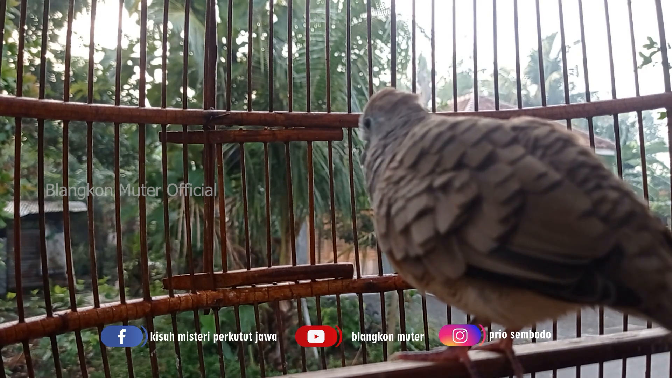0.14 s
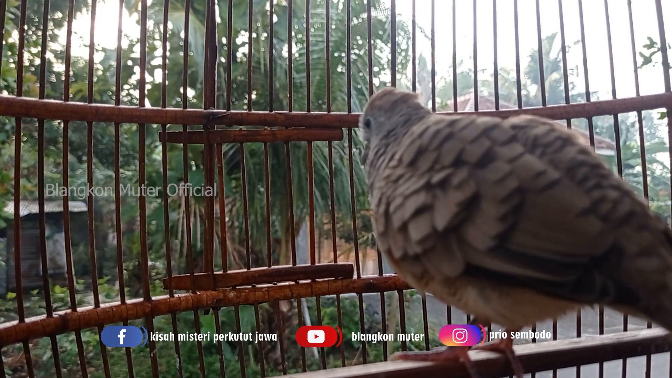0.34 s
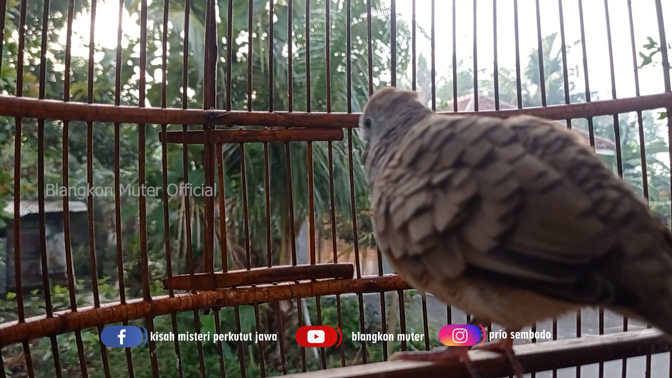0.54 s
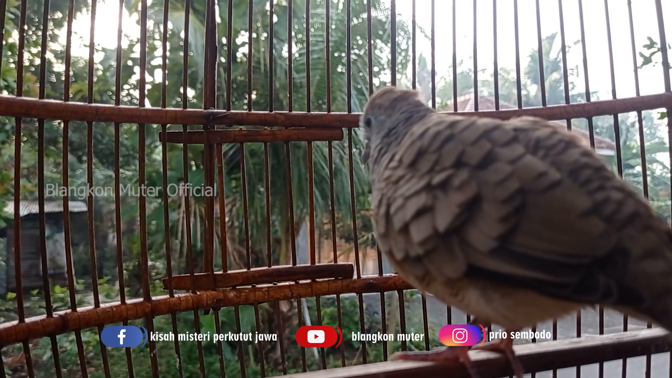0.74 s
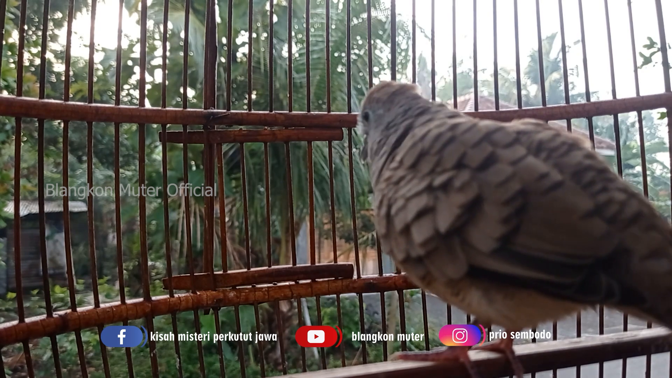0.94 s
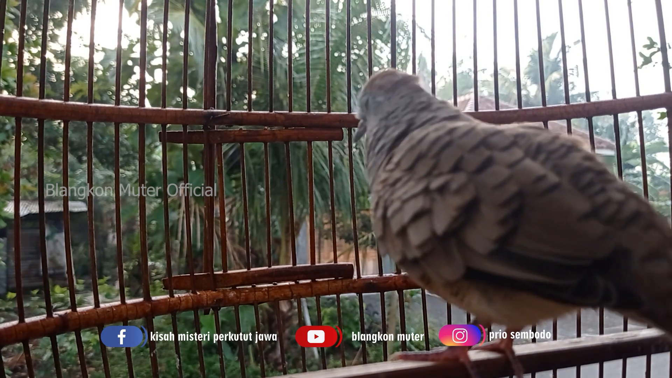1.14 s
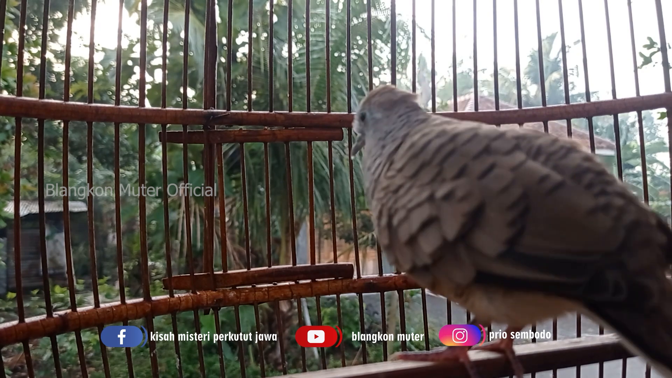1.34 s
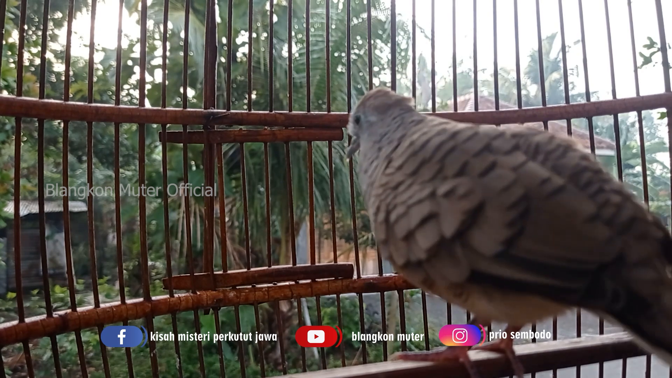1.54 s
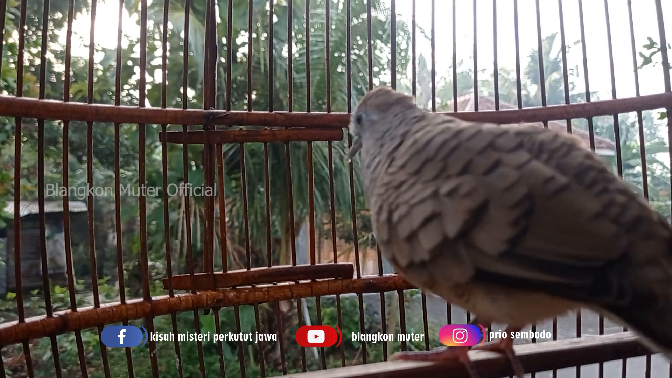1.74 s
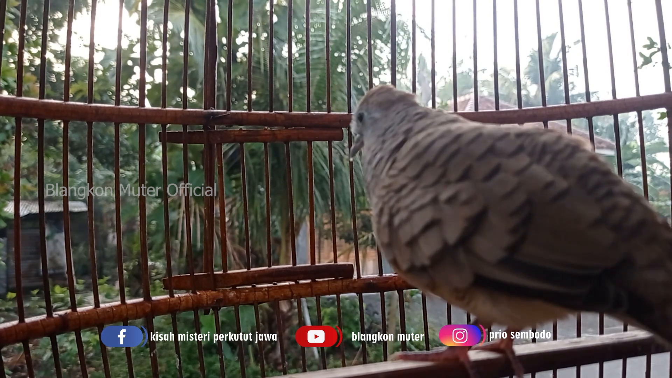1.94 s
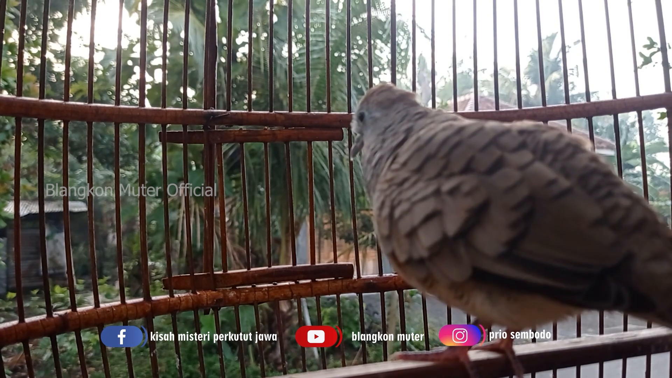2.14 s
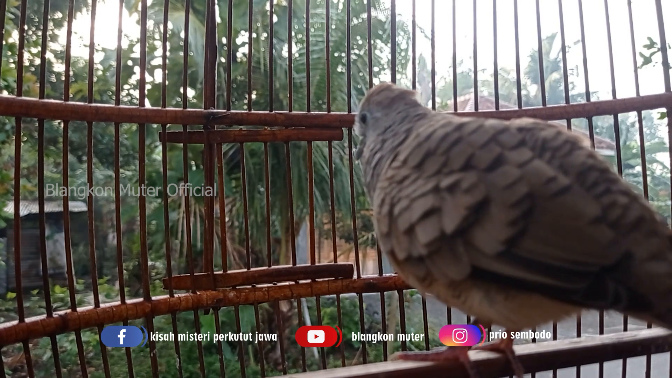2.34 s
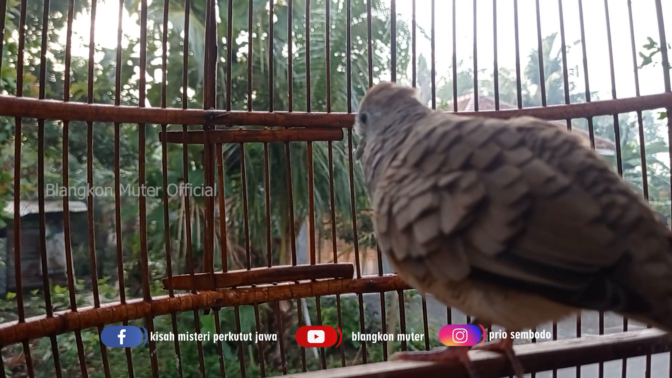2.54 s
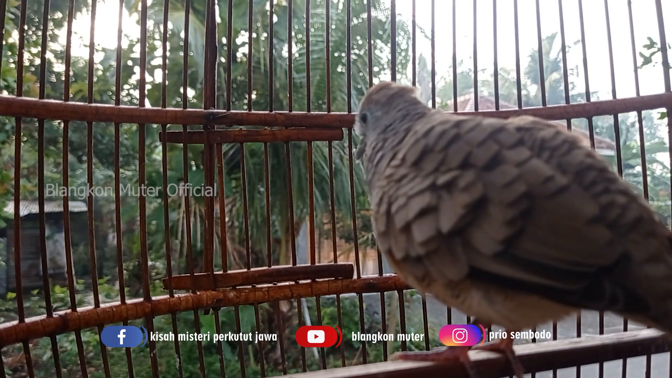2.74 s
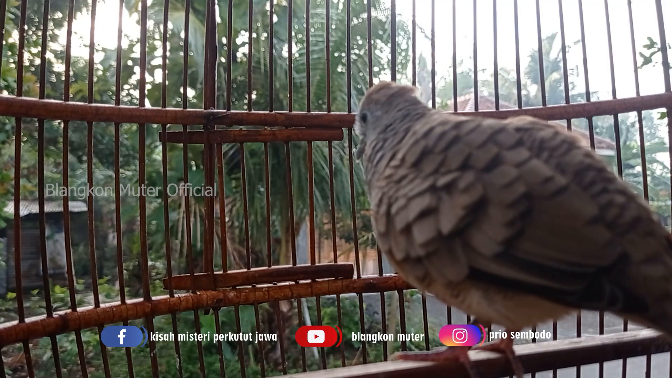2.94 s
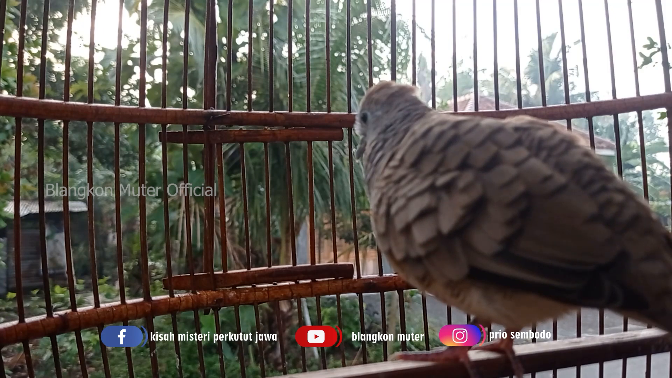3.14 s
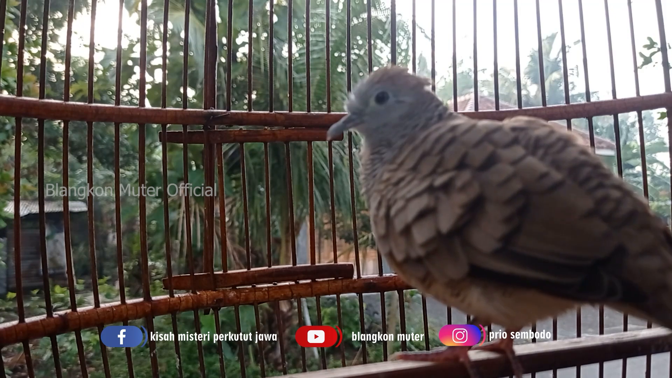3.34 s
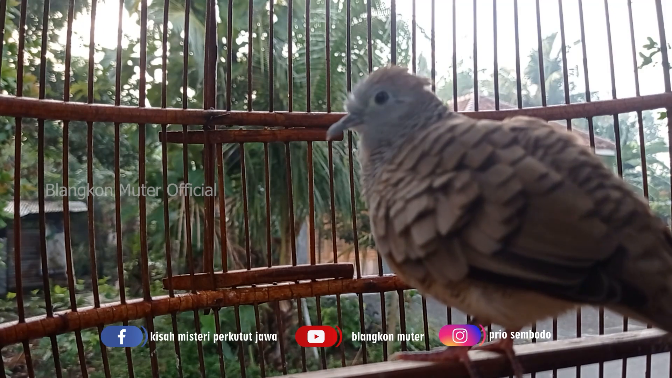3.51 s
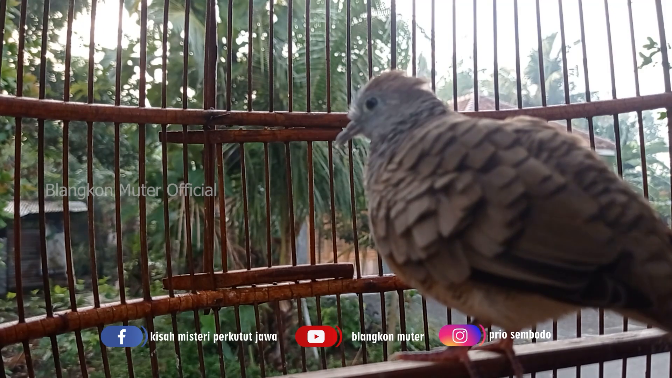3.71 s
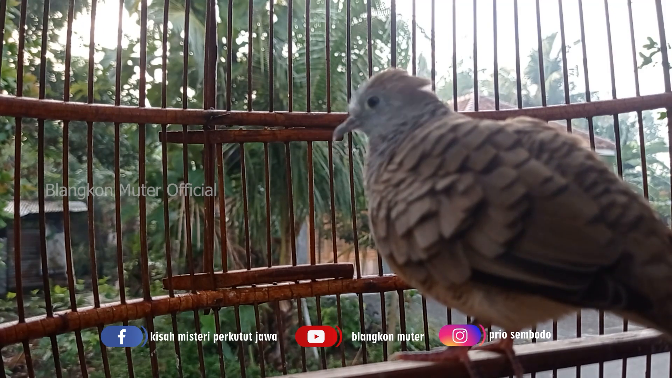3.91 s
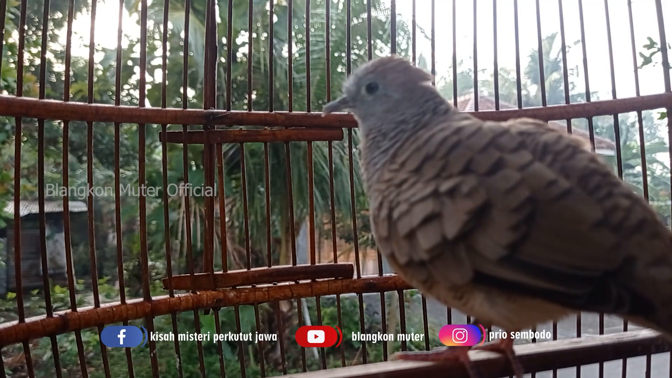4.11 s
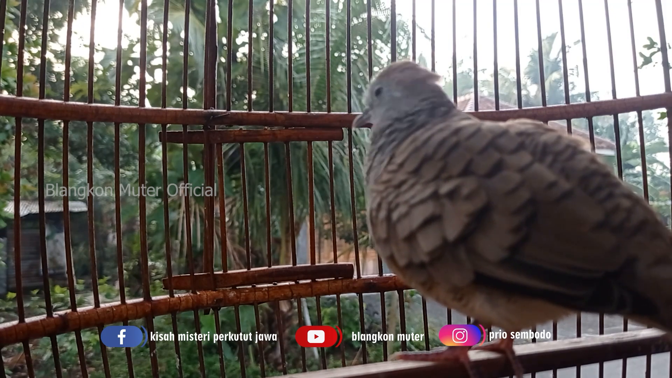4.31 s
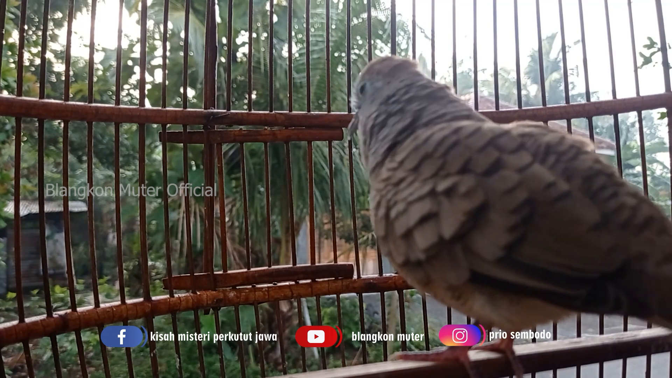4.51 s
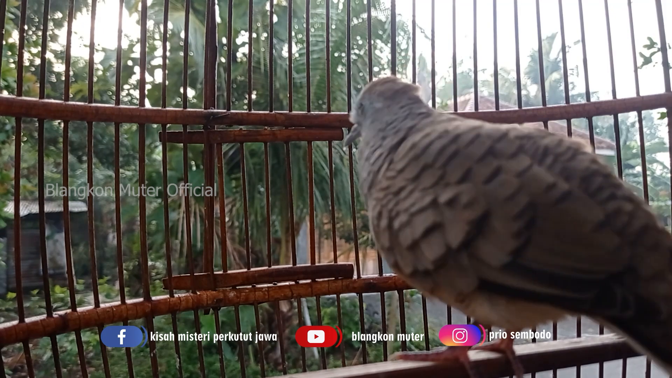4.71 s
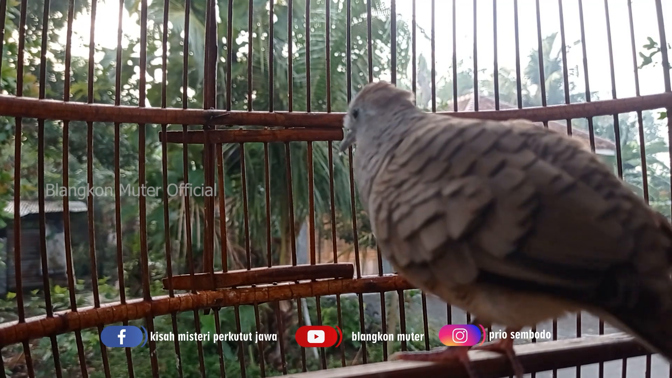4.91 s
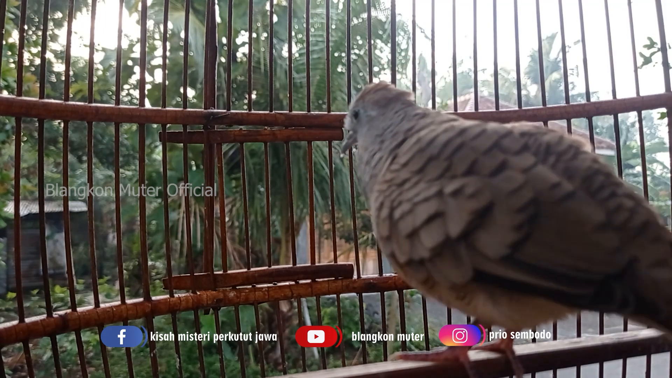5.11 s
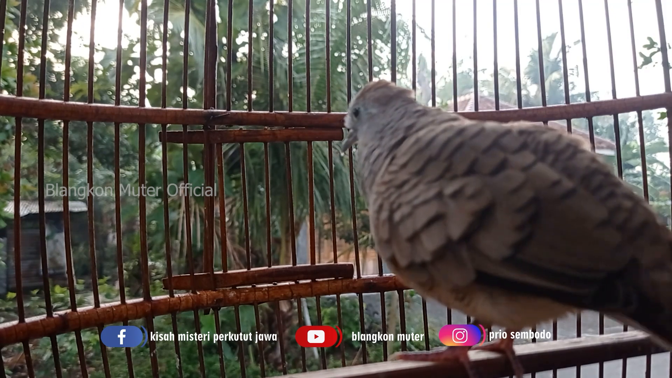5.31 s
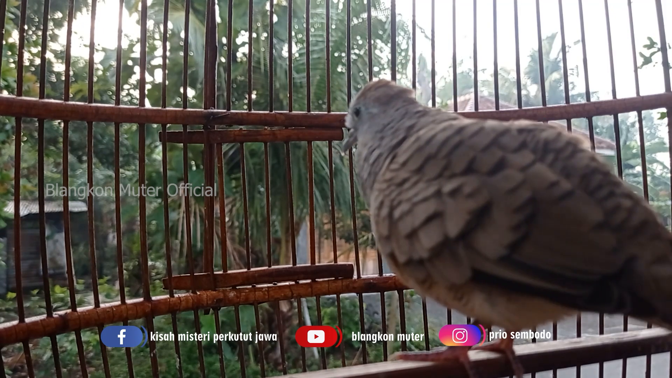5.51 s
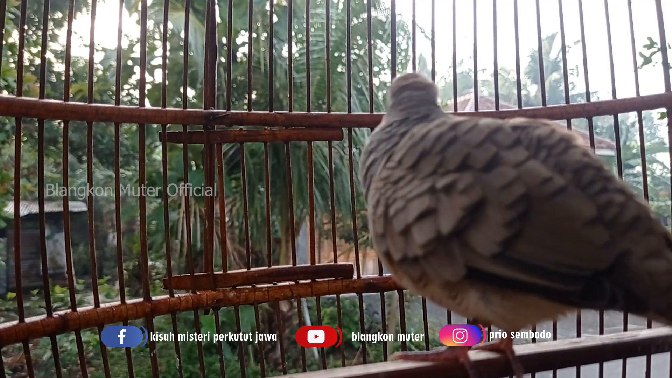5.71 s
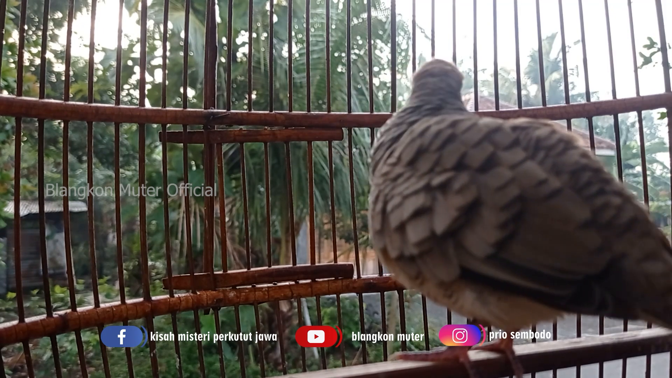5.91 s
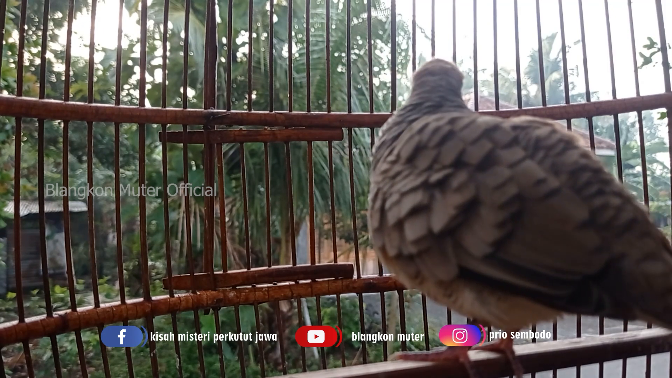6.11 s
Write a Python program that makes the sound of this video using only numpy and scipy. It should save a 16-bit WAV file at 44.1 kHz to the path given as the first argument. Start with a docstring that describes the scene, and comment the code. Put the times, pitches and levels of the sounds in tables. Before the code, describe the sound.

Open garden air with low traffic rumble, a faint coming-and-going motor hum and patchy bright hiss. From 0 to about 1 s a bigger dove, far off and diffuse, gives short purring coos and a longer falling one. At 1.1 s the near dove rasps, chucks low and breaks upward into a clear coo of about a tenth of a second, followed until 1.95 s by nine clipped, round notes, rapid at first, then more spaced. From 2 to 4 s small birds give thin falling chirps and harsh calls, with soft rustles near 2.5 and 2.9 s and a very faint high ringing around 3.6 to 4.2 s. The far dove purrs again from 3.7 to 4.7 s. At 4.5 s the near dove repeats its phrase, ending about 5.4 s. Distant whistles, chirps and hiss continue, thinning to quiet air and rumble by 6.3 s.

```python
"""A zebra dove caged outdoors, close to the microphone, sings two phrases: a long coo, then clipped ones.
Each note may start as a rasp of puffs ringing the throat, swells as a low gliding chuck and breaks upward
into a clear arched tone with overtones. Farther off a bigger dove purrs in chopped gliding tones, small
birds chirp in falling noisy tones, and coloured noise makes far chatter, rustles and a swelling hiss.
Under them lie a traffic rumble, a motor's hum and open air; for a moment a thin ringing sounds high up."""
import sys
import numpy as np
from scipy import signal
from scipy.fft import rfft, irfft
from scipy.io import wavfile

SR = 44100
rng = np.random.default_rng(int(sys.argv[2]) if len(sys.argv) > 2 else 0)


def wrap_up_sound(samples):
    """Save the sound to the file named by the first command line argument, as 16-bit audio."""
    columns = np.atleast_2d(samples).T
    # keep every value between -1 and 1, then stretch to whole-number steps
    tamed = np.clip(columns, -1, 1)
    steps = np.round(tamed * 32767).astype(np.int16)
    wavfile.write(sys.argv[1], SR, steps)


N = 276066
TIME = np.arange(N) / SR
CUTOFF_HZ = 15800

# All levels are relative; a half length runs from the middle to 3 dB down.
# open air, steady colour: f/Hz, density/dB per Hz
AIR_COLOUR = [(150, 7.5), (450, 3.5), (700, 6.5), (1000, -2.5), (2000, -4), (4000, -19.5), (6300, -13),
              (8000, -21.5), (10000, -18), (13000, -49)]
# strength of the open air: t/s, level/dB
AIR_LEVEL = [(0, -67.5), (1.4, -66), (2.6, -63.5), (3.3, -62.5), (4.0, -64), (5.3, -69), (6.26, -70)]
# far traffic rumble, colour: f/Hz, density/dB per Hz
RUMBLE_COLOUR = [(20, -38), (40, -34), (62, -2), (80, 2.5), (115, 0), (150, 4.5), (200, -3.5), (320, -6.5),
                 (450, -19), (700, -17.5), (1500, -49)]
# strength of the rumble: t/s, level/dB
RUMBLE_LEVEL = [(0, -55), (.9, -54), (1.9, -56), (2.7, -56), (3.25, -63), (3.55, -57), (4.55, -55.5),
                (4.9, -61), (5.2, -56.5), (5.9, -59), (6.26, -60)]
# slow swells of far traffic: middle t/s, half length/s, level/dB
TRAFFIC_SWELLS = [(3.05, 0.155, -67.5), (5.68, 0.19, -60)]
# colour of those swells: f/Hz, density/dB per Hz
TRAFFIC_SWELL_COLOUR = [(120, -20), (220, -3.5), (300, 5.5), (400, -10), (600, -20.5), (1000, -47)]
# a far motor's hum, coming and going: middle t/s, half length/s, level/dB, f/Hz
HUM = [(.08, 0.19, -50, 173.3), (.53, 0.13, -51, 173), (.92, .08, -53, 173.8), (1.55, 0.39, -58.5, 172.9),
       (3.12, .07, -57.5, 165.8), (4.33, 0.09, -54, 150.6), (5.14, 0.13, -58.5, 151),
       (5.86, 0.064, -59, 149.3)]
# swells of the bright hiss: middle t/s, half length/s, level/dB
HISS_SWELLS = [(.08, 0.053, -73), (.75, 0.13, -44.5), (1.645, 0.02, -58.5), (1.8, 0.071, -49.5),
               (1.94, .085, -45.5), (2.24, .04, -68), (2.77, 0.034, -61), (2.94, 0.15, -48.5),
               (3.27, .13, -56.5), (3.85, 0.19, -78.5), (4.16, 0.026, -67.5), (4.52, 0.14, -47),
               (5.18, 0.12, -63), (5.41, 0.032, -63), (5.67, 0.12, -52.5), (5.83, 0.065, -49.5),
               (6.04, 0.059, -64)]
# colour of the hiss: f/Hz, density/dB per Hz
HISS_COLOUR = [(820, -38), (1400, -16), (1550, -13.5), (2080, -6.5), (2760, -8), (3120, -4.5), (3450, -7.5),
               (4400, -3.5), (4970, -7.5), (6280, 1), (7090, -7.5), (9140, -9.5), (13300, -22.5),
               (15000, -13.5), (15800, -5)]
# soft rustling bumps: t/s, rise/s, decay/s, level/dB
BUMPS = [(2.45, 0.053, 0.072, -54.5), (2.85, 0.12, 0.43, -66), (5.56, 0.075, 0.11, -75)]
# colour of the bumps: f/Hz, density/dB per Hz
BUMP_COLOUR = [(90, -51), (180, 0), (350, -2), (700, 6.5), (1100, 1), (1800, -6.5), (3000, -45)]
# thin high ringing tones: f/Hz, level/dB
RINGING_TONES = [(5593, -74), (8021, -95), (8516, -85), (9082, -82.5), (9437, -89.5), (10099, -86),
                 (11350, -89), (13200, -91)]
# their common level curve: t/s, level/dB
RINGING_LEVEL = [(3.55, -15), (3.75, 0.5), (4.1, -2), (4.2, -32)]
# far bird chatter in the trees, flaring up: middle t/s, half length/s, level/dB
CHATTER_SWELLS = [(.05, 0.057, -61.5), (.3, .08, -69), (1.1, 0.11, -61), (1.65, 0.097, -59),
                  (2.22, 0.23, -59), (3.52, 0.36, -62), (4.15, 0.088, -61.5), (4.7, 0.19, -60),
                  (5.2, 0.084, -55.5), (6.0, 0.093, -60)]
# colour of the chatter: f/Hz, density/dB per Hz
CHATTER_COLOUR = [(900, -41.5), (1700, -5), (2300, -8.5), (3300, 0.5), (4500, -0.5), (5500, -8),
                  (7500, -14.5), (11000, -43.5)]
# far held whistles: middle t/s, half length/s, level/dB, f/Hz
WHISTLES = [(.02, 0.024, -67, 1632), (4.19, 0.083, -57, 1564), (4.42, 0.044, -56, 1545),
            (4.8, 0.12, -58.5, 1512), (5.02, 0.081, -49, 1552), (5.14, 0.081, -50, 1558),
            (5.38, .06, -58, 1528)]
# small birds' falling whistles: t/s, length/s, level/dB, start f/Hz, end f/Hz
CHIRPS = [(1.008, .062, -61, 3450, 3180), (1.062, .065, -53, 2426, 2010), (1.456, .13, -66, 3980, 3400),
          (2.027, .11, -53, 4030, 3400), (2.123, .078, -57.5, 3250, 2760), (2.259, .16, -56.5, 2854, 1936),
          (2.257, 0.173, -64, 4400, 4250), (2.477, 0.15, -60, 4140, 3940), (2.611, 0.17, -54, 3850, 3365),
          (2.952, .13, -52.5, 4010, 3310), (3.41, .16, -56, 3870, 3140), (3.656, .09, -59, 4360, 3485),
          (4.05, 0.093, -61, 4600, 3900), (4.064, .15, -63.5, 3590, 3070), (5.332, .17, -57.5, 3780, 2710),
          (6.094, .1, -54, 3503, 2730)]
# small birds' harsh calls: t/s, length/s, level/dB, start f/Hz
HARSH_CALLS = [(1.268, 0.11, -55.5, 4640), (2.48, .13, -56.5, 4800), (3.512, 0.1, -62, 2900),
               (3.661, 0.12, -60, 4240), (4.165, 0.13, -54.5, 4760), (6.15, 0.04, -58, 2730)]
# the bigger dove, twice a few short coos and a long falling one:
# t/s, length/s, attack/s, level/dB, start f/Hz, end f/Hz, purr depth (0-1)
FAR_DOVE = [(-.04, 0.14, 0.059, -46, 623, 681, 0.33), (0.179, 0.2, 0.18, -46, 498, 668, 0.62),
            (.37, .11, 0.038, -58.5, 610, 633, 0.5), (0.484, 0.48, 0.024, -46, 777, 546.3, 0.86),
            (3.697, 0.144, 0.039, -49.5, 566, 639, 0.7), (3.909, .24, 0.08, -50, 525, 637, 0.7),
            (4.225, 0.5, 0.021, -46.5, 778.3, 553, .85)]
# near dove's notes, timed at the break from chuck to clear tone:
# t/s, rasp length/s, chuck length/s, chuck level/dB, tone length/s, tone level/dB, top f/Hz
NOTES = [(1.205, 0.03, .026, -10.5, 0.091, -16.5, 1301), (1.292, 0, .003, -44, 0.037, -19, 1262),
         (1.331, 0, 0.0048, -33, 0.034, -17.5, 1247), (1.372, 0, 0.0086, -22.5, 0.038, -19, 1215),
         (1.427, 0, 0.008, -18.5, 0.031, -22, 1174), (1.497, .004, 0.011, -12, .024, -23, 1100),
         (1.566, 0.01, 0.0091, -14, .030, -24, 1147), (1.647, .015, .008, -16, 0.031, -23.5, 1176),
         (1.748, 0.01, 0.014, -14, 0.042, -20.5, 1210), (1.905, 0.013, .016, -15.5, 0.048, -21, 1229),
         (4.624, 0.028, 0.029, -11.5, 0.091, -17, 1312), (4.711, 0, 0.0049, -48, 0.036, -18.5, 1275),
         (4.752, 0, 0.011, -23.5, 0.03, -17.5, 1245), (4.793, 0.0006, 0.0089, -27, .035, -18.5, 1218),
         (4.84, 0, 0.0069, -21, 0.032, -21.5, 1184), (4.905, 0.0028, .012, -15, 0.022, -22.5, 1132),
         (4.977, .008, 0.0088, -14.5, 0.021, -22, 1128), (5.056, 0.018, 0.007, -15.5, 0.027, -23, 1160),
         (5.155, 0.015, 0.0068, -15.5, .038, -22, 1201), (5.311, 0.014, .016, -16, 0.049, -23, 1225)]
# lone puffs just before a note: t/s, level/dB
PUFFS = [(1.107, -36.5), (1.473, -35), (4.526, -36), (4.953, -31.5)]
# throat resonances that the rasp rings: f/Hz, width/Hz, level/dB
THROAT = [(622, 93, -15), (887, 71, 1.5), (1300, 82, -8), (1476, 84, -16)]
# end pitch of the chuck's glide, highest for brief chucks: chuck length/s, end f/Hz
CHUCK_TOP = [(.011, 1096), (.017, 992), (.03, 1028)]
# the tone snaps in after a hard chuck, eases in after a weaker one: chuck level/dB, attack/s
ATTACK = [(-42.5, 0.0049), (-26.5, 0.0061), (-17.5, 0.0025)]
# short tones crest early, the long coo climbs almost to its end: tone length/s, crest place (0-1)
CREST = [(.025, 0.2), (.052, 0.5), (.095, .84)]
# how far a tone droops at its end, most for middling tops near 1165 Hz: top f/Hz, droop/Hz
DROOP = [(1110, 43), (1165, 120), (1215, 35), (1300, 60)]
# spectral envelope of the clear tone's overtones: f/Hz, level/dB
OVERTONES = [(2000, -26.5), (2600, -33.5), (3500, -42.5), (4300, -46), (5000, -48.5), (5800, -45.5),
             (6700, -34.5), (7400, -42.5), (8300, -65.5), (12000, -65)]


def from_db(db):
    """Amplitude factor of a level in dB."""
    return 10 ** (np.asarray(db) / 20)


def rms_one(x):
    """Scales a sound to rms 1."""
    return x / np.sqrt(np.mean(x ** 2) + 1e-20)


def in_time(rows):
    """Columns of a curve over time, joined by straight lines."""
    s, *columns = np.transpose(rows)
    return [np.interp(TIME, s, c) for c in columns]


def during(rows):
    """One while a curve lasts, else zero."""
    return (TIME >= rows[0][0]) & (TIME <= rows[-1][0])


def at_hz(points, hz):
    """Reads a spectrum on a log-frequency axis."""
    f, db = np.transpose(points)
    return np.interp(np.log(hz + 1e-9), np.log(f), db)


def lookup(points, at):
    """Reads a rule given as points joined by straight lines."""
    return np.interp(at, *np.transpose(points))


def ease(u):
    """A quarter sine from 0 to 1."""
    return np.sin(np.pi / 2 * np.clip(u, 0, 1))


def phase_of(hz):
    """Phase in radians: the running sum of frequency."""
    return 2 * np.pi * np.cumsum(hz) / SR


def drift(rate, size=N):
    """Random curve around zero: straight lines between normal knots, rate knots a second."""
    knots = rng.standard_normal(8192)
    return np.interp(np.arange(size) * rate / SR, np.arange(len(knots)), knots)


def noise(spectrum):
    """Noise of a given colour, rms 1."""
    hz = np.fft.rfftfreq(N, 1 / SR)
    colour = from_db(at_hz(spectrum, hz))
    return rms_one(irfft(rfft(rng.standard_normal(N)) * colour, N))


def add(out, s, sound):
    """Mixes a sound in at time s."""
    i = max(round(s * SR), 0)
    out[i:i + len(sound)] += sound[:max(N - i, 0)]


def swell(middle, half_length, rise=4.5, fall=2.5):
    """A round-topped swell of height 1; rise and fall set how steep its flanks are."""
    u = (TIME - middle) / half_length
    steepness = np.where(u < 0, rise, fall)
    return 1 / np.sqrt(1 + np.abs(u) ** (2 * steepness))


def swells(rows, floor_db, rise, fall):
    """Gain that swells again and again out of a steady floor; powers add."""
    power = sum((from_db(db) * swell(s, half, rise, fall)) ** 2 for s, half, db in rows)
    return np.sqrt(from_db(floor_db) ** 2 + power)


def held_tones(rows, waver, waver_rate):
    """Sines of unsteady pitch that each swell and fade."""
    out = np.zeros(N)
    for s, half, db, hz in rows:
        phase = phase_of(hz * (1 + waver * drift(waver_rate)))
        out += from_db(db) * swell(s, half) * np.sqrt(2) * np.sin(phase)
    return out


def garden(x, t60, gap_s):
    """Scatter from walls and leaves: a decaying diffuse tail that starts after a short gap."""
    t = TIME[:SR]
    tail = rng.standard_normal(SR) * from_db(-60 * t / t60) * (t > gap_s)
    return signal.fftconvolve(x, tail / np.sqrt(np.sum(tail ** 2)))[:N]


def background(hum_db=0.0, rumble_db=0.0, lumpy_db=4.0):
    """Lumpy traffic rumble with slow swells, a hum that comes and goes, and open air."""
    (low_db,), (air_db,) = in_time(RUMBLE_LEVEL), in_time(AIR_LEVEL)
    hum = from_db(hum_db) * held_tones(HUM, waver=0.011, waver_rate=11.0)
    rumble = from_db(low_db + rumble_db + lumpy_db * drift(14)) * noise(RUMBLE_COLOUR)
    passing = swells(TRAFFIC_SWELLS, floor_db=-78.5, rise=2.5, fall=2.5) * noise(TRAFFIC_SWELL_COLOUR)
    air = from_db(air_db) * noise(AIR_COLOUR)
    return hum + rumble + passing + air


def hiss(level_db=8.0, full_db=-52, dulling=0.35, split_hz=10500):
    """Smooth bright noise that swells, and loses treble as it fades."""
    gain = swells(HISS_SWELLS, floor_db=-88, rise=3.95, fall=2.63)
    bright = noise(HISS_COLOUR)
    dull = signal.sosfiltfilt(signal.butter(4, split_hz, fs=SR, output="sos"), bright)
    openness = np.minimum(gain / from_db(full_db), 1) ** dulling
    return from_db(level_db) * gain * (dull + openness * (bright - dull))


def bumps():
    """Dull, soft rustles of noise that rise quickly and die away exponentially."""
    envelope = np.zeros(N)
    for s, rise, decay, db in BUMPS:
        dying = np.exp(-np.maximum(TIME - s - rise, 0) / decay)
        envelope += from_db(db) * ease((TIME - s) / rise) * dying
    return envelope * noise(BUMP_COLOUR)


def ringing(waver=0.0011, flutter_db=4.5):
    """A few thin, fluttering sines come and go together high in the treble."""
    curve_db, = in_time(RINGING_LEVEL)
    tones = np.zeros(N)
    for hz, db in RINGING_TONES:
        gain = from_db(db + flutter_db * drift(30))
        tones += gain * np.sqrt(2) * np.sin(phase_of(hz * (1 + waver * drift(40))))
    return during(RINGING_LEVEL) * from_db(curve_db) * tones


def chatter(level_db=0.5):
    """Far calls blurred into noise; each narrow band comes and goes by itself."""
    wash, edges = noise(CHATTER_COLOUR), np.geomspace(1300, 10000, 41)
    patchy = np.zeros(N)
    for band in zip(edges, edges[1:]):
        narrow = signal.sosfilt(signal.butter(2, band, "band", fs=SR, output="sos"), wash)
        patchy += narrow * from_db(3.5 * drift(16))
    gain = swells(CHATTER_SWELLS, floor_db=-70, rise=3.3, fall=2.5)
    return from_db(level_db) * gain * rms_one(patchy)


def whistle(flutter_db=6.5, level_db=0.0):
    """Thin tones far away, unsteady in pitch and level."""
    return from_db(level_db + flutter_db * drift(25)) * held_tones(WHISTLES, waver=0.0055, waver_rate=70)


def bird_call(length, start_hz, end_hz, spread_hz, purity, edge=.12):
    """A falling tone inside a band of noise that falls with it; rms 1 before its edges fade."""
    u = np.linspace(0, 1, int(length * SR))
    phase = phase_of(start_hz + (end_hz - start_hz) * u)
    in_phase = (purity + drift(spread_hz, len(u))) * np.cos(phase)
    call = in_phase + drift(spread_hz, len(u)) * np.sin(phase)
    return ease(u / edge) * ease((1 - u) / edge) * rms_one(call)


def chirps(base_spread_hz=90, smear_s=.026, harsh_fall_hz_per_s=2600, clear_db=0.0, harsh_db=0.0):
    """Small birds: falling whistles, the more smeared the faster they fall, and wide harsh calls."""
    out = np.zeros(N)
    for s, length, db, start_hz, end_hz in CHIRPS:
        spread = base_spread_hz + smear_s * abs(start_hz - end_hz) / length
        add(out, s, from_db(db + clear_db) * bird_call(length, start_hz, end_hz, spread, purity=1.3))
    for s, length, db, start_hz in HARSH_CALLS:
        end_hz = start_hz - harsh_fall_hz_per_s * length
        call = bird_call(length, start_hz, end_hz, spread_hz=620, purity=.3)
        add(out, s, from_db(db + harsh_db) * call)
    return out


def far_dove(purr_hz=54, unevenness=0.1, waver=0.032, sharpness=2.38, release_s=0.095, linger=1.45,
             shake_db=2.0, level_db=0.0):
    """Low gliding coos that linger near their top pitch, chopped by uneven pulses into a purr."""
    out = np.zeros(N)
    purr_phase = phase_of(purr_hz * (1 + unevenness * drift(30)))
    purr = rms_one(np.exp(sharpness * np.cos(purr_phase)))
    wobble, shake = 1 + waver * drift(120), shake_db * drift(45)
    for s, length, attack, db, start_hz, end_hz, depth in FAR_DOVE:
        t, depth = np.clip(TIME - s, 0, length), np.clip(depth, 0, 1)
        from_top = t / length if start_hz > end_hz else 1 - t / length
        hz = max(start_hz, end_hz) - abs(end_hz - start_hz) * from_top ** linger
        envelope = from_db(db + level_db + shake) * ease(t / attack) * ease((length - t) / release_s)
        chopped = envelope * (1 - depth + depth * purr)
        out += chopped * np.sqrt(2) * np.sin(phase_of(hz * wobble))
    return out


def ring(pulses, hz, width_hz):
    """Each pulse sets a damped sine ringing."""
    r, w = np.exp(-np.pi * width_hz / SR), 2 * np.pi * hz / SR
    return signal.lfilter([0, np.sin(w)], [1, -2 * r * np.cos(w), r * r], pulses + 1e-18)


def throat(at, sizes, edge_hz=1700):
    """Puffs at the given times ring the throat's resonances; peak 1."""
    puffs = np.zeros(SR // 10)
    puffs[(at * SR).astype(int)] = sizes
    sound = np.zeros(len(puffs))
    for k, (hz, width_hz, db) in enumerate(THROAT):
        sound += (-1) ** k * from_db(db) * ring(puffs, hz, width_hz)   # neighbours in opposite sign
    sound = signal.sosfilt(signal.butter(4, [480, edge_hz], "band", fs=SR, output="sos"), sound)
    return sound / np.abs(sound).max()


def crop(x, low_hz=620, high_hz=1480):
    """The dove's swollen throat passes only the fundamental's band and rounds each note's edges."""
    return signal.sosfiltfilt(signal.butter(4, [low_hz, high_hz], "band", fs=SR, output="sos"), x)


def rasps(pulse_hz=270, jitter=.12, first_db=-30, growth_db=17, peak_db=-20.5, build_s=.0075):
    """Separate, growing puffs of the syrinx before the tone catches; brief rasps stay weak."""
    out = np.zeros(N)
    for s, length, chuck_length, *_ in NOTES:
        gaps = np.abs(1 + jitter * rng.standard_normal(16)) / pulse_hz
        if length > 0:   # slurred notes have no rasp
            at = np.cumsum(gaps) - gaps[0]
            at = at[at <= max(length - 1 / pulse_hz / 2, 0)]
            db = first_db + (peak_db - first_db) * min(length / build_s, 1)
            rasp = throat(at, from_db(growth_db * at / length))
            add(out, s - chuck_length - length, from_db(db) * rasp)
    for s, db in PUFFS:
        add(out, s, from_db(db) * throat(np.zeros(1), 1))
    return out


def chucks(start_hz=865, bend=0.81, rise=0.65, fall=0.42, second_db=-39, level_db=0.0):
    """The lower register: a short upward glide that collapses at the break."""
    tone, sheen = np.zeros((2, N))
    for s, _, length, db, *_ in NOTES:
        u = np.linspace(0, 1, int(length * SR))
        phase = phase_of(start_hz + (lookup(CHUCK_TOP, length) - start_hz) * u ** bend)
        envelope = ease(u / rise) * ease((1 - u) / fall)
        add(tone, s - length, from_db(db) * envelope * np.sin(phase))
        second_harmonic = envelope ** 2 * np.sin(2 * phase)
        add(sheen, s - length, from_db(db + second_db) * second_harmonic)
    return from_db(level_db) * (crop(tone) + sheen)


def coos(climb_hz_per_s=1350, fade_s=.015, db_per_hz=.018, waver=0.0063, overtone_db=0.0,
         level_db=0.34, release_s=0.013, release_db=-37):
    """The upper register: an almost pure arched tone whose overtones grow with loudness."""
    tone, sheen = np.zeros((2, N))
    for s, _, _, chuck_db, length, db, top_hz in NOTES:
        t = TIME[:int(length * SR)]
        u = t / length
        # climb to a crest, then droop
        place = np.clip(lookup(CREST, length), .1, .9)
        before, after = np.clip(1 - u / place, 0, 1), np.clip((u - place) / (1 - place), 0, 1)
        climb = climb_hz_per_s * length * before ** 1.4
        hz = top_hz - climb - lookup(DROOP, top_hz) * after ** 2
        phase = phase_of(hz * (1 + waver * drift(400, len(t))))
        envelope = ease(t / lookup(ATTACK, chuck_db)) * ease((length - t) / fade_s)
        envelope = envelope * from_db(db_per_hz * (hz - top_hz))   # weaker away from the crest's pitch
        overtones = sum(from_db(at_hz(OVERTONES, k * hz)) * np.sin(k * phase) for k in range(2, 11))
        add(tone, s, from_db(db) * envelope * np.sin(phase))
        add(sheen, s, from_db(db + overtone_db) * envelope ** 2 * overtones)
        # the syrinx flutters once more, weakly, as it closes
        t = TIME[:int(release_s * SR)]
        flutter = np.sin(np.pi * t / release_s) * np.sin(2 * np.pi * hz[-1] * t)
        add(tone, s + length - .001, from_db(release_db) * flutter)
    return from_db(level_db) * (crop(tone) + sheen)


def scene(near_wet_db=-28, dove_dry_db=-1.5, dove_wet_db=-2.0, birds_dry_db=-4, birds_wet_db=-2.0):
    """The caged dove is close and nearly dry; the bigger dove and small birds are washed in scatter."""
    dove = coos() + chucks() + rasps()
    near = dove + from_db(near_wet_db) * garden(dove, t60=0.43, gap_s=0.011)
    neighbour, birds = far_dove(), chirps() + whistle()
    far = from_db(dove_dry_db) * neighbour
    far += from_db(dove_wet_db) * garden(neighbour, t60=.3, gap_s=.003)
    far += from_db(birds_dry_db) * birds
    far += from_db(birds_wet_db) * garden(birds, t60=.45, gap_s=.004)
    return (near + far + chatter() + ringing() + bumps() + hiss() + background())[None]


def record(dry, low_cut_hz=42):
    """The microphone loses the deep bass; the top is cut steeply."""
    thin = signal.sosfilt(signal.butter(2, low_cut_hz, "high", fs=SR, output="sos"), dry)
    return signal.sosfilt(signal.ellip(12, .1, 90, CUTOFF_HZ, fs=SR, output="sos"), thin)


dry = scene()
out = record(dry)
wrap_up_sound(out)
```